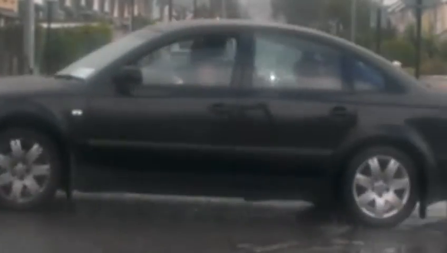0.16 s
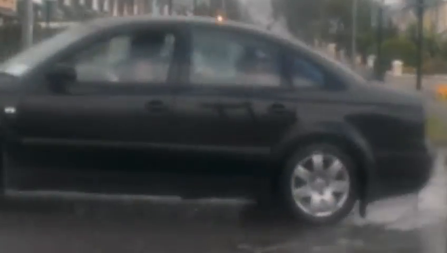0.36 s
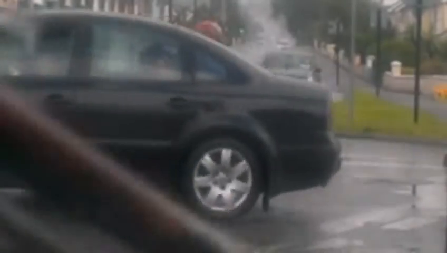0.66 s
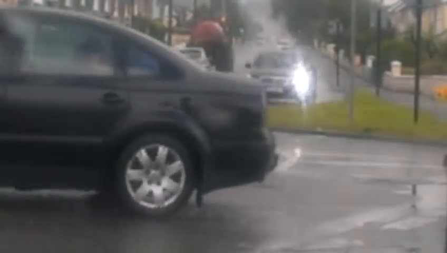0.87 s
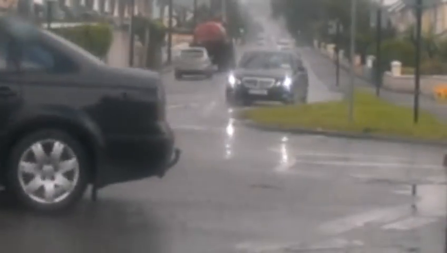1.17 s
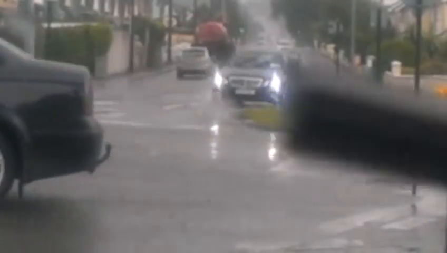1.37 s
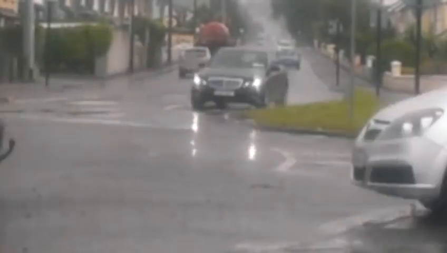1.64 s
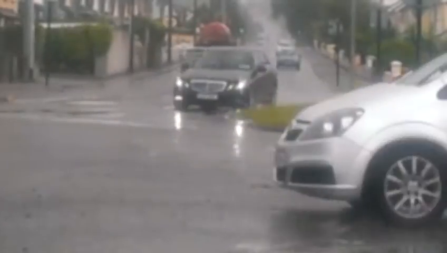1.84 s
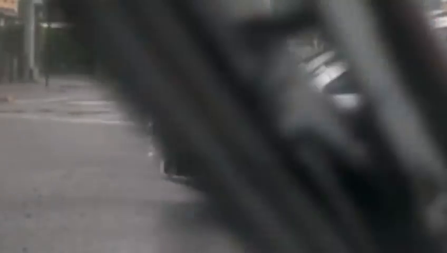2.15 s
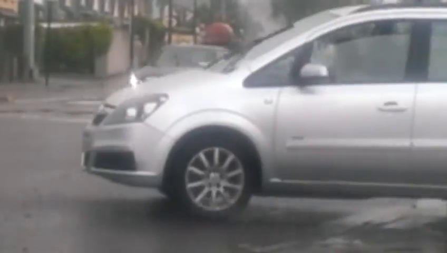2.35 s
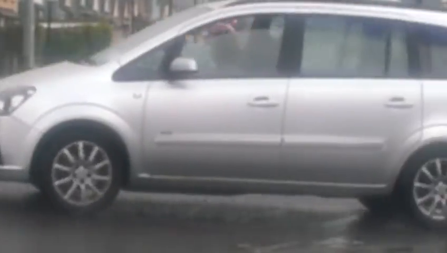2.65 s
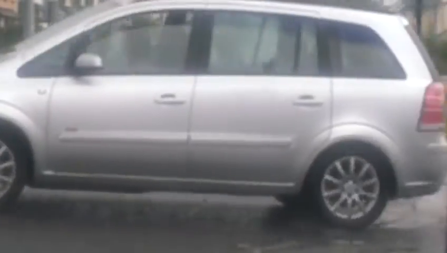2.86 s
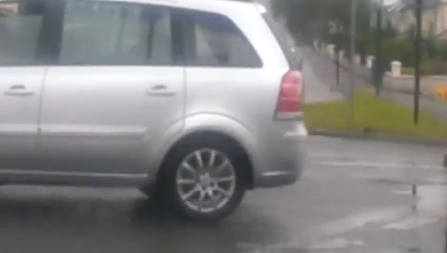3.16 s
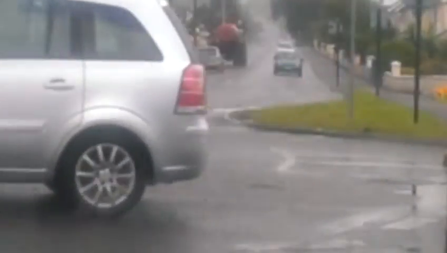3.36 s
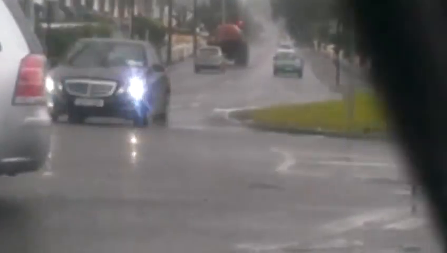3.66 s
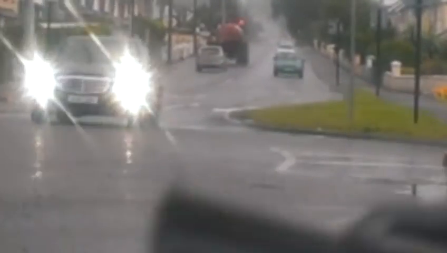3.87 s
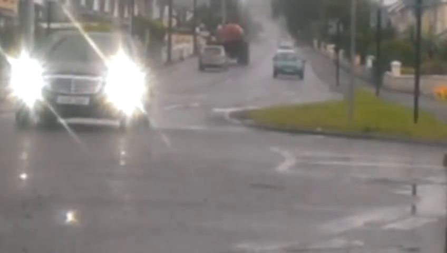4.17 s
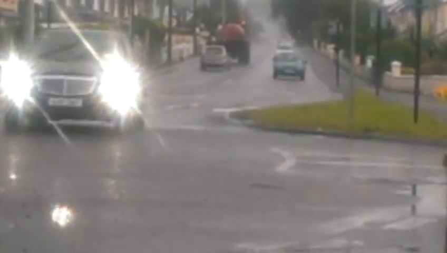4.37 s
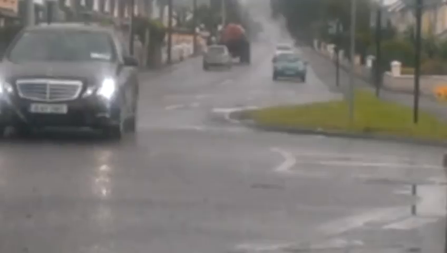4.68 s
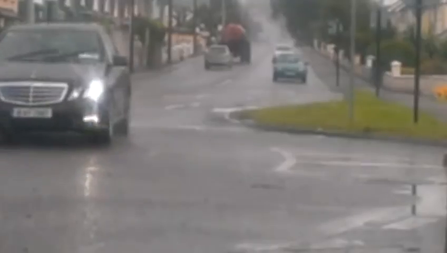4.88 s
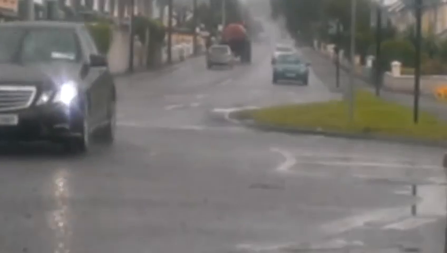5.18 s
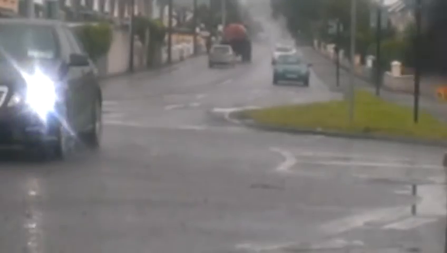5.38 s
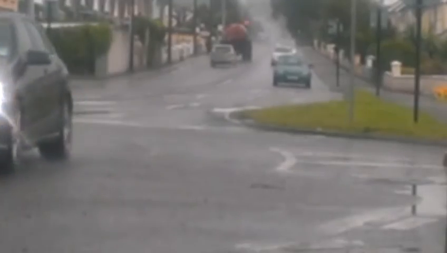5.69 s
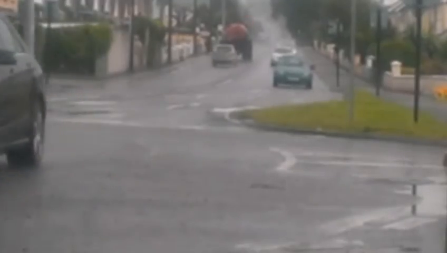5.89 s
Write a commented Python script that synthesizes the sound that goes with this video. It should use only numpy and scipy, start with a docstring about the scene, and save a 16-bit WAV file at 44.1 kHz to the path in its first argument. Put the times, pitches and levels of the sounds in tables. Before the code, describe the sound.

Inside a car standing in light rain, the windscreen wipers swing back and forth, close to the microphone. About every three quarters of a second the arms knock and the rubber blades flop over with a dull double thud. Between turns the blades rub softly and a faint motor whine rises. Underneath are a low cabin hum, a fading hiss of tyres on the wet road outside and a few raindrops ticking on the glass.

```python
"""Front seat of a car standing in light rain, microphone inside, close to the windscreen.
First come the cabin's hum and wet traffic outside, its hiss slowly fading, and a drop ticks on the glass.
Half a second in, the wiper arms knock at the near end and the rubber blades flop over in dull thuds.
They sweep out, the motor whining up through the stroke, then knock and flop again at the far end.
So it goes on, a turn about every three quarters of a second, with a few more drops in between."""
import sys
import numpy as np
from scipy import signal
from scipy.fft import rfft, irfft, next_fast_len
from scipy.io import wavfile
from scipy.ndimage import uniform_filter1d, map_coordinates

SR = 44100
rng = np.random.default_rng(int(sys.argv[2]) if len(sys.argv) > 2 else 0)


def wrap_up_sound(samples):
    """Save the sound to the file named by the first command line argument, as 16-bit audio."""
    columns = np.atleast_2d(samples).T
    # keep every value between -1 and 1, then stretch to whole-number steps
    tamed = np.clip(columns, -1, 1)
    steps = np.round(tamed * 32767).astype(np.int16)
    wavfile.write(sys.argv[1], SR, steps)


N = 265904

# air modes of the cabin around the microphone: pitch_hz, width_hz, gain_db
CABIN_MODES = [(146.8, 22.7, 1), (227, 32.2, 1.5), (274, 35, -1.5), (370, 47.7, 0.5), (554, 51.5, -3),
               (667, 40, -5), (776, 38, -5.5), (991, 62, -13)]
# decay of the padded cabin: frequency_hz, t60_s
CABIN_DECAY = [(100, 0.24), (250, 0.12), (1000, 0.19), (4000, 0.13), (12000, 0.015)]
# reflections off the windows and roof: delay_s, gain_db
CABIN_ECHOES = [(.0055, -9), (0.0124, -10.5)]
# tyres on the wet road, heard from inside: frequency_hz, gain_db
ROAD_SPECTRUM = [(300, -8), (900, -2), (1400, -1.5), (2050, -4.5), (2750, -0.5), (3300, -5), (4200, -13.5),
                 (7000, -23.5), (15000, -31)]
# a fine high hiss, for the rain and the hiss around the thuds: frequency_hz, gain_db
FINE_SPECTRUM = [(1500, -30), (4000, -4), (6000, -2), (8000, -1.5), (9000, 3), (10200, -.5), (12000, 0),
                 (14000, .5), (15600, 2)]
# thin high hisses: centre_s, half_length_s, level_db
HISSES = [(0.747, 0.14, -75.5), (3.128, .16, -76), (5.76, 0.087, -74)]
# raindrops on the glass: start_s, relative_db
RAINDROPS = [(0.1217, -45.5), (1.4025, -46), (2.676, -49), (3.9595, -48), (5.2443, -44.5)]
# rubber rubbing on glass, and the blade shuddering: pitch_hz, width_hz, gain_db
RUB_MODES = [(336, 35, 6.5), (379, 55, -11.5), (456, 7.4, -19)]
JUDDER_MODES = [(193, 14.5, -6), (236, 14.4, -12.5)]
# an arm snaps and rattles: start_s, level_db, edge_hz
ARM_SNAPS = [(0.5049, -15.5, 10400), (0.5131, -24.5, 8540), (0.539, -30, 6940), (0.553, -53, 7000)]
# the ring of a hard contact, and of the blade's frame: pitch_hz, width_hz, gain_db
SNAP_MODES = [(1650, 500, -6), (2760, 270, 4.5), (4240, 230, -3), (6800, 2640, -4.5), (9300, 2800, -4)]
FRAME_MODES = [(1218, 160, 3), (1653, 210, 0), (2540, 830, -2.5), (2726, 430, 5.5), (2823, 630, 0)]
# water splashing under a blade: frequency_hz, gain_db
SPLASH_SPECTRUM = [(1500, -5), (3400, 1.5), (4600, -2), (5800, -11), (8800, -6), (11000, -11),
                   (15500, -11.5)]
# the windscreen, struck far from and near the microphone: pitch_hz, width_hz, gain_db
FAR_GLASS_MODES = [(150, 24, -24.5), (220.2, 49, -5), (364.5, 57.7, 2.5), (523, 94, -8.5),
                   (584.6, 22, -5.5), (624, 220, -20), (805, 113, -25.5), (950, 88, -25.5),
                   (1110, 74, -24.5)]
NEAR_GLASS_MODES = [(98, 7.8, -15.5), (144, 13, -29), (212.8, 30.3, 5), (363, 78, -1.5), (462, 49, -0.5),
                    (522, 78, -6.5), (665, 32, -12.5), (817, 97, -18.5), (969, 56, -15), (1050, 120, -54)]
# how each named contact lands, added to its knock or flip: gain_db, boom_db, rap_db
FAR_CONTACTS = dict(slack=(-10.5, -2.5, 8.8), arm=(1, 0.68, 1), second_arm=(3.8, -12, 1),
                rebound=(-6.5, 2.3, 12.5), peel=(0, 1.8, 5.7), blade=(-2.1, 2.2, 18),
                second_blade=(0, -3.1, 8.8), settle=(-7, 6, 1))
NEAR_CONTACTS = dict(slack=(-3, -0.78, 2.9), arm=(0, 0, 9.3), second_arm=(-1.5, 1.9, 0.74),
                 rebound=(-5.5, 0, 7.8), peel=(-12.5, -2, 3), blade=(0, -2, -10.5),
                 second_blade=(0, 7.2, -31), settle=(-6, 7.1, 4))
# gaps between the contacts of a turn: slack_s, rebound_s, peel_s, settle_s
FAR_GAPS = dict(slack_s=.028, rebound_s=.035, peel_s=0.01149, settle_s=0.00931)
NEAR_GAPS = dict(slack_s=.016, rebound_s=0.032, peel_s=.016, settle_s=.018)
# the linkage takes up its play after each near knock: delay_s, level_db, boom_db, rap_db
LINKAGE_PLAY = [(.142, -39.5, 2, 0), (.196, -43, -1, 12)]
# the arms halt, near and far by turns: start_s, relative_db, second_arm_lag_s, boom_db, scuff_relative_db
ARM_KNOCKS = [(.493, -24, .011, -1, -39.5), (1.2465, -20, .0133, -2.5, -53),
              (2.034, -24.5, 0.0094, -1.5, -44.5), (2.7839, -18.5, 0.021, 1, -49.5),
              (3.582, -21.5, 0.00806, -1, -42), (4.316, -19.5, .0135, 2.5, -56),
              (5.121, -22, 0.0089, 0.5, -40.5), (5.8612, -20, .0133, -1.5, -55)]
# the blades then flip: start_s, relative_db, second_blade_lag_s, second_relative_db, boom_db,
# slap_relative_db, splash_relative_db
BLADE_FLIPS = [(0.5391, -27, .02, -38, -3, -31.5, 3.5), (1.339, -22.5, 0.013, -19, 0.5, -30, -5),
               (2.088, -26.5, .017, -35.5, 1.5, -52, 3), (2.875, -19.5, 0.015, -20, -5.5, -28.5, -5),
               (3.6363, -20, .0135, -26, 0.5, -31, -3), (4.4074, -21.5, .018, -21, 5.5, -30, 0),
               (5.1765, -25, 0.014, -23.5, 0, -33.5, -5), (5.9403, -21, 0.025, -21, 1, -29.5, -3.5)]

STROKE_S = .77  # from one end to the other
# friction peaks once a stroke, going in (to the near end) or out: level_db, before_end_s, spread_s
RUB_IN, RUB_OUT = (-55, 0.46, .15), (-64, .66, 0.34)
JUDDER_IN, JUDDER_OUT = (-70.5, 0.16, .4), (-58, 0.46, 0.22)
# the motor's load eases before the end of a stroke: swell_lead_s, swell_spread_s, pitch_climb_s
EASE_IN, EASE_OUT = (.235, 0.051, 0.38), (0.21, 0.051, .52)
LOADED_HZ, LOADED_DB, FREE_HZ, FREE_DB = 447, -64.5, 506, -49.5  # whine under load and running free
BRAKE_S, BRAKE_DB = .05, 5.5  # the whine sinks as the arms slow into the turn
# wet rubber scuffs at a knock, peels off and slaps down at a flip: rise_s, t60_s
SCUFF, PEEL, SLAP = (0.019, 0.32), (0.0075, 0.12), (0.00093, 0.07)
SCUFF_LAG_S, FLIP_HISS_HALF_S = 0.0073, 0.056
PEEL_DB, CLACK_DB = (-33, -10), (0.5, -8.5)  # added to slap_relative_db: near_db, far_db
SLACK_GROWTH_DB, SETTLE_LOSS_DB = 13, 4  # from one tap to the next


def amp(db):
    """Decibels to gain."""
    return 10 ** (np.asarray(db) / 20)


def unit(x):
    """Scale to rms 1."""
    return x / np.sqrt(np.mean(x ** 2) + 1e-20)


def along(points, hz):
    """Read (frequency_hz, value) points on a log axis."""
    f, v = np.transpose(points)
    return np.interp(np.log(hz + 1), np.log(f + 1), v)


def wobble(rate):
    """A smooth random curve, rate knots a second."""
    return map_coordinates(rng.standard_normal(int(N * rate / SR) + 4), [np.arange(N) * rate / SR])


def add(track, s, sound):
    """Mix a sound in at s seconds."""
    part = track[max(round(s * SR), 0):][:len(sound)]
    part += sound[:len(part)]


def filtered(x, response):
    """Pass x through a complex frequency response."""
    size = next_fast_len(len(x) + SR // 4)
    return irfft(rfft(x, size) * response(np.fft.rfftfreq(size, 1 / SR)), size)[:len(x)]


def noise(spectrum):
    """Noise of rms 1 with a (frequency_hz, gain_db) spectrum."""
    return unit(filtered(rng.standard_normal(N), lambda hz: amp(along(spectrum, hz))))


def resonances(modes, f):
    """Causal response of (pitch_hz, width_hz, gain_db) modes."""
    return sum((-1) ** k * amp(db) * 1j * f * width / (hz * hz - f * f + 1j * f * width)
               for k, (hz, width, db) in enumerate(modes))


def resonant_noise(modes, low_hz, edge_hz):
    """Noise of rms 1 in a set of resonances, falling steeply outside the two edges."""
    def response(f):
        low_cut = f ** 2 / np.hypot(f ** 2, low_hz ** 2)
        return resonances(modes, f) * low_cut / (1 + (f / edge_hz) ** 8)
    return unit(filtered(rng.standard_normal(N), response))


def ring(modes, low_hz, high_hz, order):
    """One blow on a set of modes, peak 1; the softer the contact, the lower its upper edge."""
    free = irfft(resonances(modes, np.fft.rfftfreq(SR // 4, 1 / SR)))
    band = signal.butter(order, [low_hz, min(high_hz, .45 * SR)], 'band', fs=SR, output='sos')
    blow = signal.sosfilt(band, free)
    return blow / np.abs(blow).max()


def in_cabin(x, wet_db):
    """A short sound reaches the microphone with its own diffuse tail from the padded cabin."""
    hz, t, spectra = signal.stft(rng.standard_normal(SR // 4), SR, nperseg=256)
    decay = amp(-60 * t / along(CABIN_DECAY, hz)[:, None])
    tail = signal.istft(spectra * decay, SR, nperseg=256)[1]
    return x + amp(wet_db) * signal.fftconvolve(x, tail / np.linalg.norm(tail))[:len(x)]


def traffic(t):
    """Outside, tyres hiss on the wet road and fade as the crossing cars leave."""
    first_db, last_db, fade_s = -64, -72.5, 2.35
    level_db = last_db + (first_db - last_db) * np.exp(-t / fade_s)
    return amp(level_db + 0.63 * wobble(10)) * noise(ROAD_SPECTRUM)


def cabin_hum(t):
    """Room tone: the air around the microphone hums in its modes; the level dips briefly once."""
    dip_db = 5.5 * np.exp(-((t - 4.68) / 0.28) ** 2)
    return amp(-57.5 - dip_db + 1.2 * wobble(12)) * resonant_noise(CABIN_MODES, low_hz=94, edge_hz=3200)


def hisses(t):
    """Faint, thin hisses come and go high in the treble."""
    swell = sum(amp(db) * np.exp(-((t - s) / half_s) ** 4) for s, half_s, db in HISSES)
    return swell * resonant_noise([(9000, 800, 0)], low_hz=7000, edge_hz=14000)


def rain(t):
    """Fine rain fizzes on the outside of the glass, and single drops tick as they splash."""
    out = amp(-70.5 + 1.4 * wobble(11)) * noise(FINE_SPECTRUM)
    decay = amp(-10.5 - 60 * t[:SR // 4] / 0.045)
    for s, db in RAINDROPS:
        add(out, s, amp(db) * decay * noise(FINE_SPECTRUM)[:len(decay)])
    return out


def stroke_state(t, inward, outward):
    """At each moment: seconds left in the stroke, and the settings for its direction."""
    ends = np.array([knock[0] for knock in ARM_KNOCKS] + [ARM_KNOCKS[-1][0] + STROKE_S])
    stroke = np.searchsorted(ends, t)
    return ends[stroke] - t, np.array([inward, outward])[stroke % 2].T


def motor_whine(t):
    """The gear whine climbs and swells as the load eases towards the end of each stroke."""
    left_s, (lead_s, spread_s, climb_s) = stroke_state(t, EASE_IN, EASE_OUT)
    hz = LOADED_HZ + (FREE_HZ - LOADED_HZ) * np.clip(1 - left_s / climb_s, 0, 1)
    phase = 2 * np.pi * np.cumsum(hz * (1 + 0.0046 * wobble(45))) / SR
    ease = 1 / (1 + np.exp((left_s - lead_s) / spread_s))
    level_db = LOADED_DB + (FREE_DB - LOADED_DB) * ease
    braking_db = BRAKE_DB * np.clip(1 - left_s / BRAKE_S, 0, 1)
    flutter_db = .5 * wobble(4) + 1.5 * wobble(45)
    return amp(level_db - braking_db + flutter_db) * unit(np.sin(phase))


def rubber_friction(t):
    """The blades drag over the glass, mostly rubbing on the way in and juddering on the way out."""
    def swell(inward, outward):
        left_s, (db, lead_s, spread_s) = stroke_state(t, inward, outward)
        return amp(db) * np.exp(-((left_s - lead_s) / spread_s) ** 2 / 2)
    rub = swell(RUB_IN, RUB_OUT) * resonant_noise(RUB_MODES, low_hz=280, edge_hz=800)
    judder = swell(JUDDER_IN, JUDDER_OUT) * resonant_noise(JUDDER_MODES, low_hz=169.5, edge_hz=470)
    return rub + judder


def hiss_and_rumble(t, thuds):
    """A faint high hiss and low rumble swell with the thuds, the hiss most as the blades flip."""
    swell = np.abs(uniform_filter1d(thuds ** 2, size=2000)) ** .25
    flipping = sum(np.exp(-((t - flip[0]) / FLIP_HISS_HALF_S) ** 2) for flip in BLADE_FLIPS)
    hiss = swell * (amp(-61.5) + amp(-50.5) * flipping) * noise(FINE_SPECTRUM)
    rumble = amp(-63) * (swell + .022) * noise([(20, 0), (55, -3), (95, 0), (200, -40), (600, -120)])
    return hiss + rumble


def snaps_and_clacks():
    """An arm snaps at the first turn, and a blade's frame clacks against its stop at every flip."""
    out = np.zeros(N)
    clacks = [(s, slap_db + CLACK_DB[k % 2], 2600) for k, (s, *_, slap_db, _) in enumerate(BLADE_FLIPS)]
    for s, db, edge_hz in ARM_SNAPS + clacks:
        click = ring(SNAP_MODES, low_hz=920, high_hz=edge_hz, order=3)
        add(out, s, amp(db) * in_cabin(click, wet_db=-9.5))
    return out


def blade_slaps(t):
    """Each blade scuffs, peels off and slaps down on its other edge: its frame rings, water splashes."""
    def burst(s, db, rise_s, t60_s):
        return amp(db - 12.5) * np.exp(np.minimum((t - s) / rise_s, (s - t) * np.log(1000) / t60_s))
    frame, water = np.zeros(N), np.zeros(N)
    for k, (knock_s, *_, scuff_db) in enumerate(ARM_KNOCKS):
        flip_s, *_, slap_db, splash_db = BLADE_FLIPS[k]
        gaps = FAR_GAPS if k % 2 else NEAR_GAPS
        scuff = burst(knock_s + SCUFF_LAG_S, scuff_db, *SCUFF)
        peel = burst(flip_s - gaps['peel_s'], slap_db + PEEL_DB[k % 2], *PEEL)
        envelope = scuff + peel + burst(flip_s, slap_db, *SLAP)
        frame += envelope
        water += envelope * amp(splash_db - 10)
    return frame * resonant_noise(FRAME_MODES, low_hz=607, edge_hz=2820) + water * noise(SPLASH_SPECTRUM)


def turn_blows(knocks, flips, contacts, slack_s, rebound_s, peel_s, settle_s):
    """At each turn slack runs out, both arms knock and rebound, both blades peel, flip and settle."""
    blows = []

    def strike(name, s, db, boom_db):
        gain_db, more_boom_db, rap_db = contacts[name]
        blows.append((s, db + gain_db, boom_db + more_boom_db, rap_db))
    for s, db, lag_s, boom_db, _ in knocks:
        strike('slack', s - 2 * slack_s, db - SLACK_GROWTH_DB, boom_db)
        strike('slack', s - slack_s, db, boom_db)
        strike('arm', s, db, boom_db)
        strike('second_arm', s + lag_s, db, boom_db)
        strike('rebound', s + rebound_s, db, boom_db)
    for s, db, lag_s, second_db, boom_db, *_ in flips:
        strike('peel', s - peel_s, db, boom_db)
        strike('blade', s, db, boom_db)
        strike('second_blade', s + lag_s, second_db, boom_db)
        for k in range(2):
            strike('settle', s + lag_s + (k + 1) * settle_s, second_db - k * SETTLE_LOSS_DB, boom_db)
    return blows


def windscreen_thuds(blows, glass, echo_db, wet_db, edge_hz):
    """Soft blows ring the glass; where they land sets the share of low (boom) and high (rap) modes."""
    out = np.zeros(N)
    for s, db, boom_db, rap_db in blows:
        modes = [(hz, width, gain_db + boom_db * (170 < hz < 290) + rap_db * (hz > 630))
                 for hz, width, gain_db in glass]
        thud = amp(db) * ring(modes, low_hz=57.6, high_hz=edge_hz, order=7)
        onset_s = s - .001
        add(out, onset_s, in_cabin(thud, wet_db))
        for delay_s, wall_db in CABIN_ECHOES:
            add(out, onset_s + delay_s, amp(echo_db + wall_db) * thud)
    return out


def scene():
    """From the front seat: traffic outside, rain on the glass, the wipers close in front."""
    t = np.arange(N) / SR
    far = turn_blows(ARM_KNOCKS[1::2], BLADE_FLIPS[1::2], FAR_CONTACTS, **FAR_GAPS)
    near = turn_blows(ARM_KNOCKS[::2], BLADE_FLIPS[::2], NEAR_CONTACTS, **NEAR_GAPS)
    play = [(knock[0] + delay_s, *blow) for knock in ARM_KNOCKS[::2] for delay_s, *blow in LINKAGE_PLAY]
    thuds = windscreen_thuds(far, FAR_GLASS_MODES, echo_db=2.5, wet_db=-10.5, edge_hz=1020)
    thuds += windscreen_thuds(near + play, NEAR_GLASS_MODES, echo_db=-1.5, wet_db=-3.5, edge_hz=1230)
    turns = hiss_and_rumble(t, thuds) + blade_slaps(t) + snaps_and_clacks() + thuds
    strokes = motor_whine(t) + rubber_friction(t)
    background = traffic(t) + cabin_hum(t) + hisses(t) + rain(t)
    return background + strokes + turns


def record(dry):
    """The camera behind the microphone adds a thin, wavering whistle and cuts off the highest treble."""
    whistle_hz, top_hz = 15489, 15850
    whistle = amp(-83) * unit(np.sin(2 * np.pi * whistle_hz * np.arange(N) / SR + wobble(25)))
    return filtered(dry + whistle, lambda hz: hz < top_hz)


dry = scene()
out = record(dry)
wrap_up_sound(out)
```